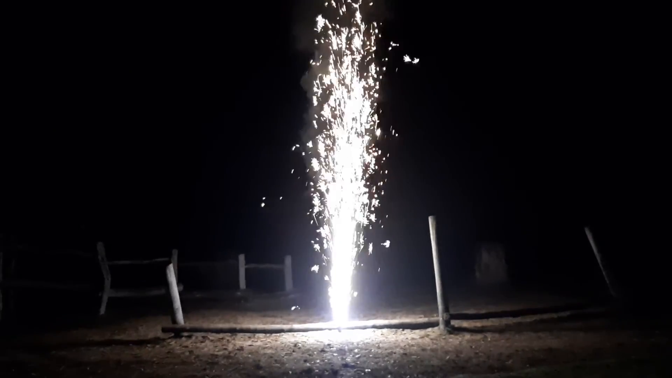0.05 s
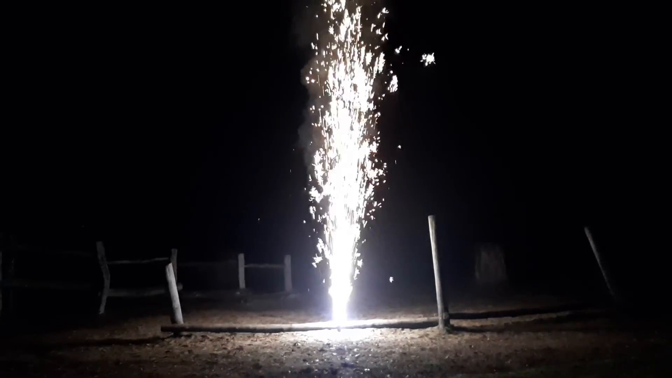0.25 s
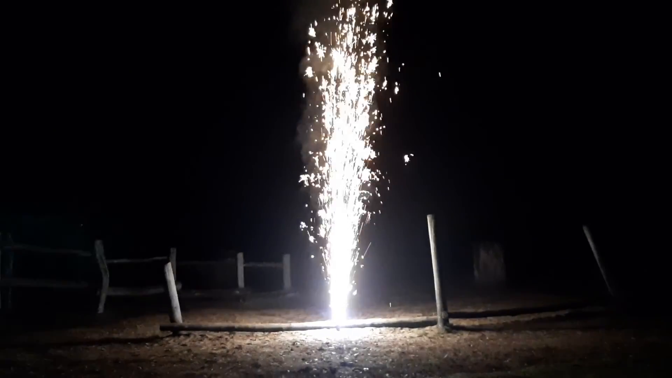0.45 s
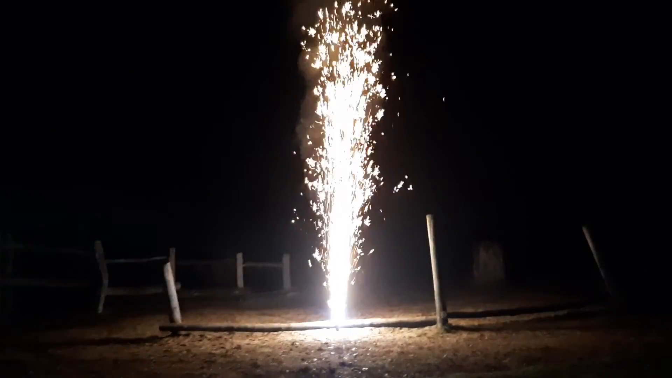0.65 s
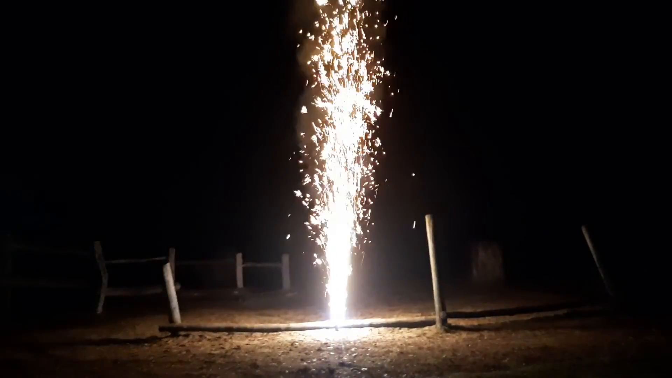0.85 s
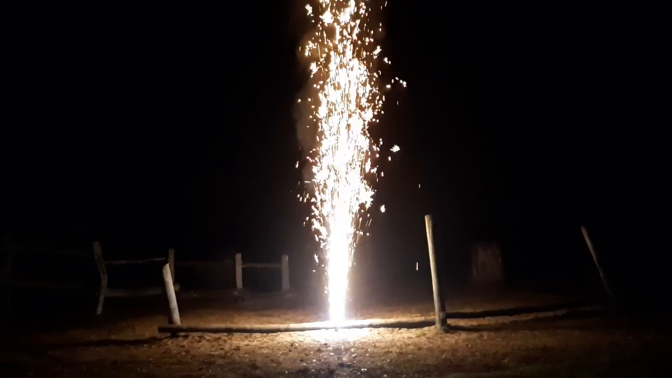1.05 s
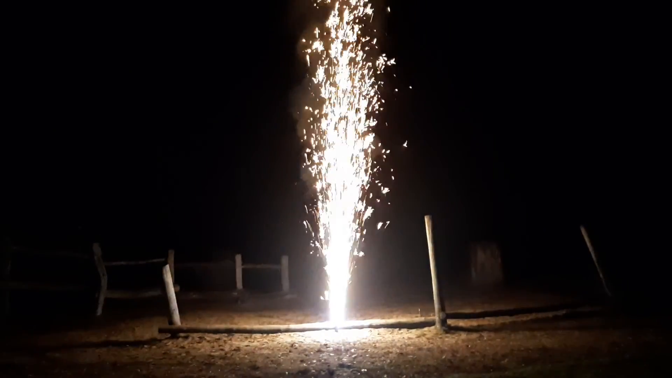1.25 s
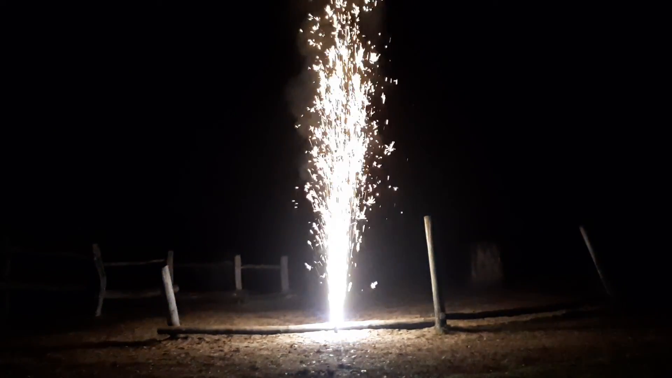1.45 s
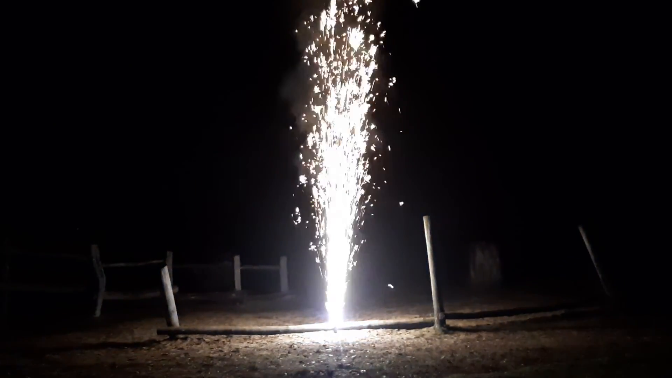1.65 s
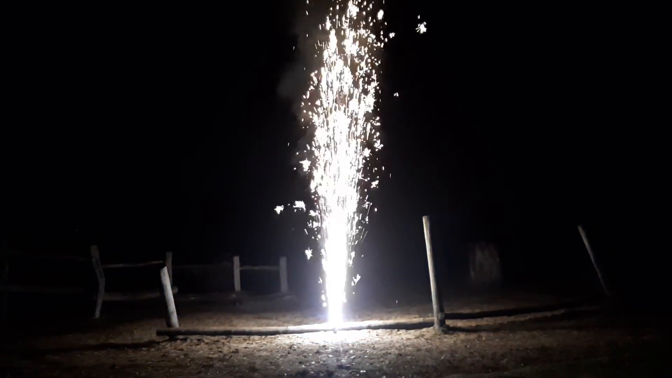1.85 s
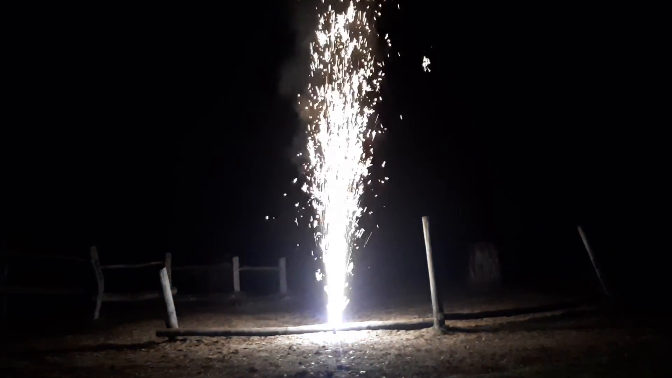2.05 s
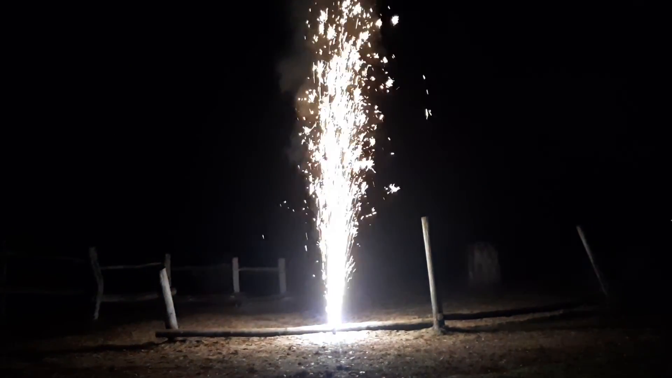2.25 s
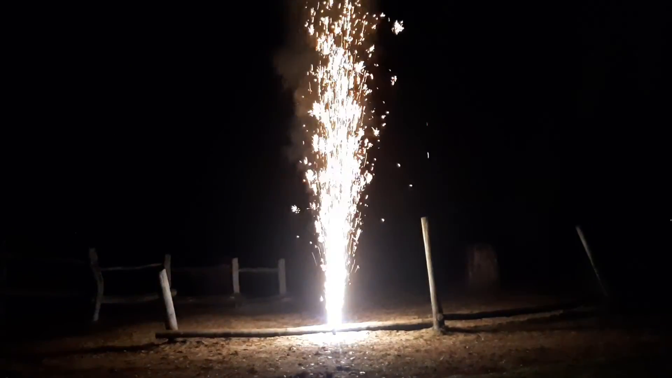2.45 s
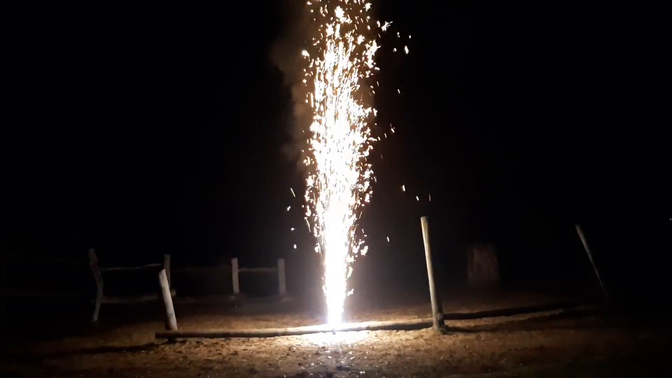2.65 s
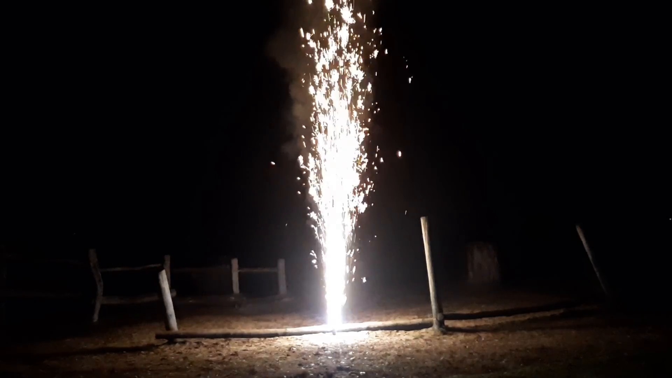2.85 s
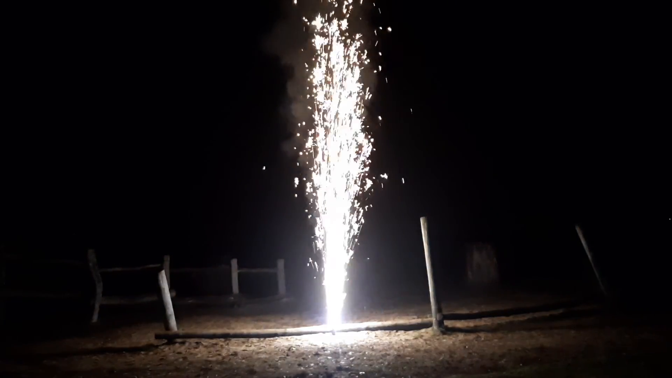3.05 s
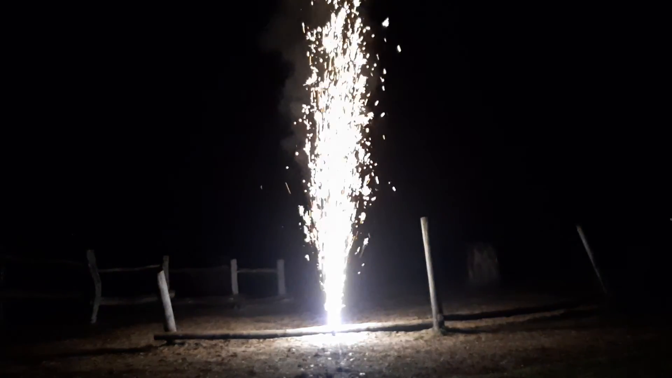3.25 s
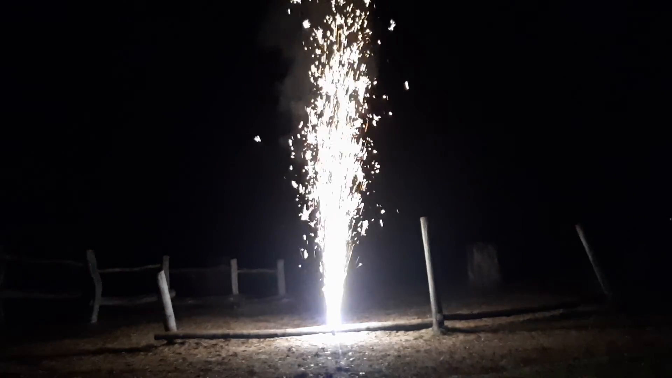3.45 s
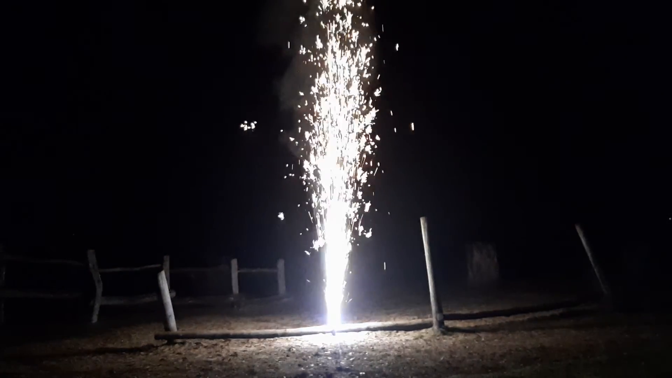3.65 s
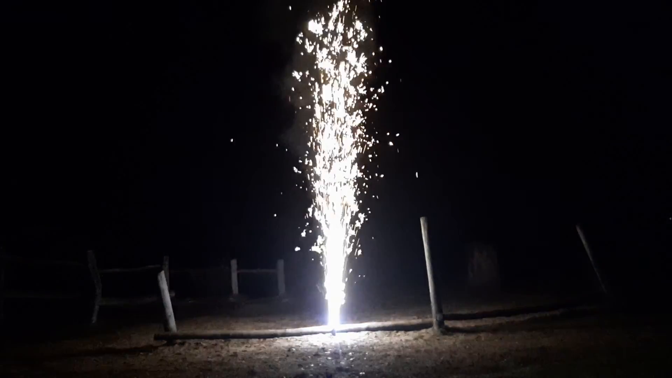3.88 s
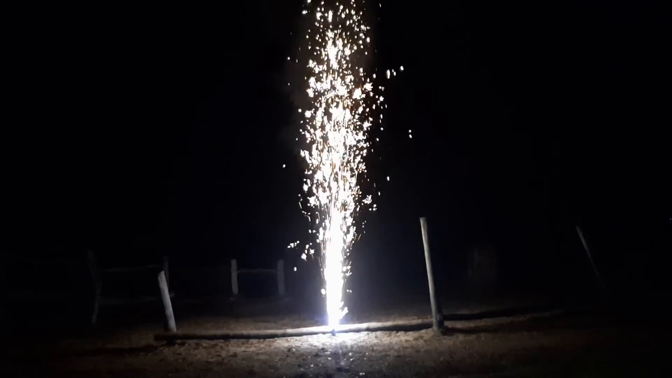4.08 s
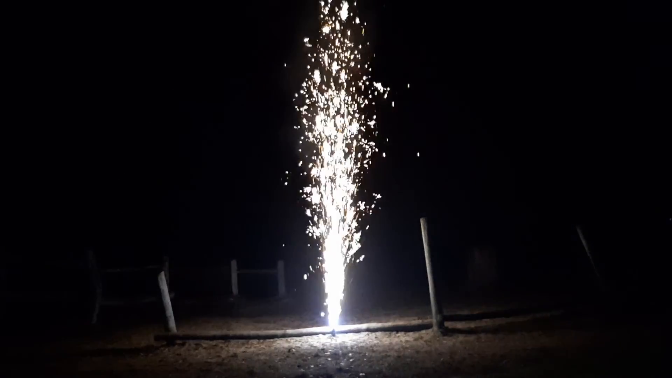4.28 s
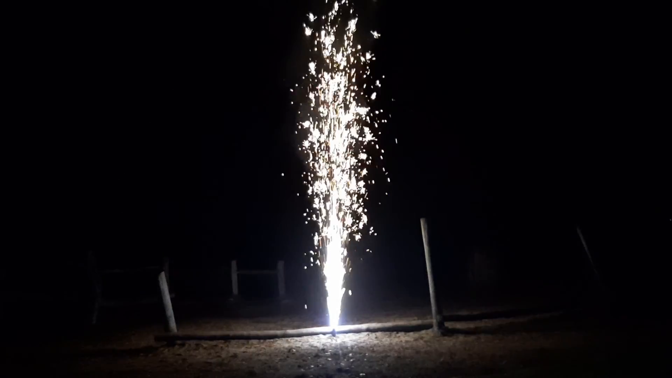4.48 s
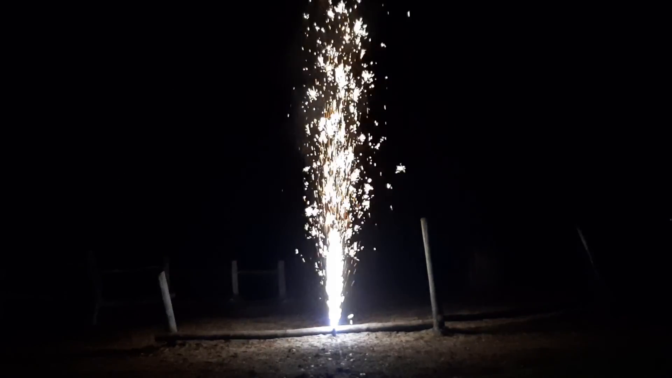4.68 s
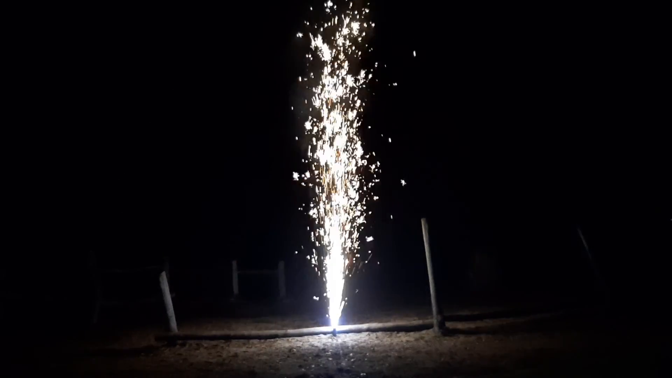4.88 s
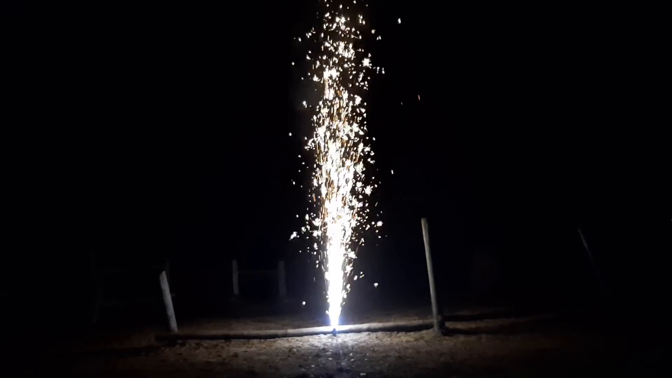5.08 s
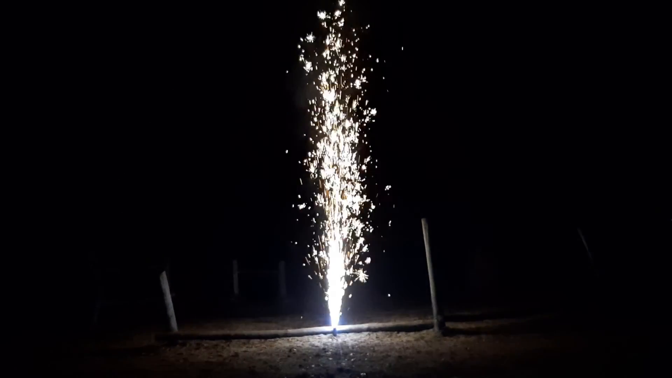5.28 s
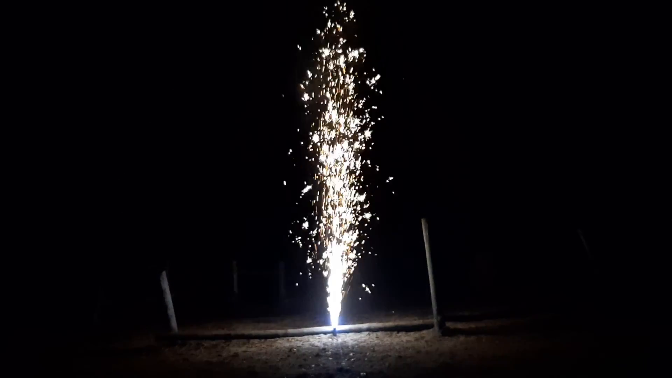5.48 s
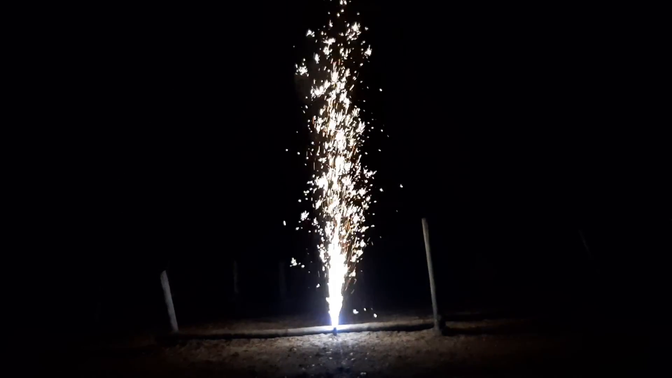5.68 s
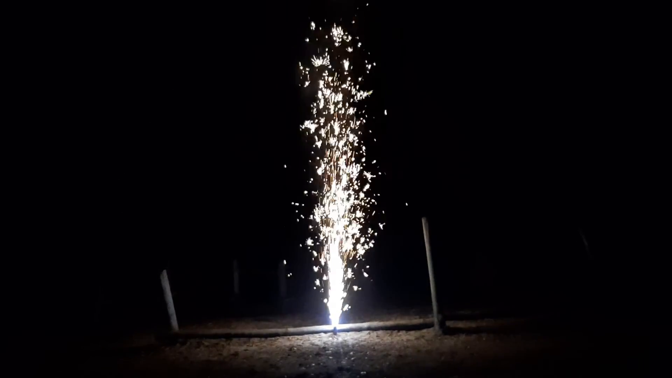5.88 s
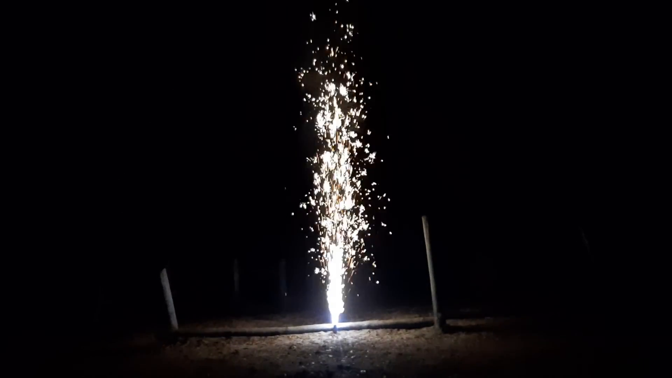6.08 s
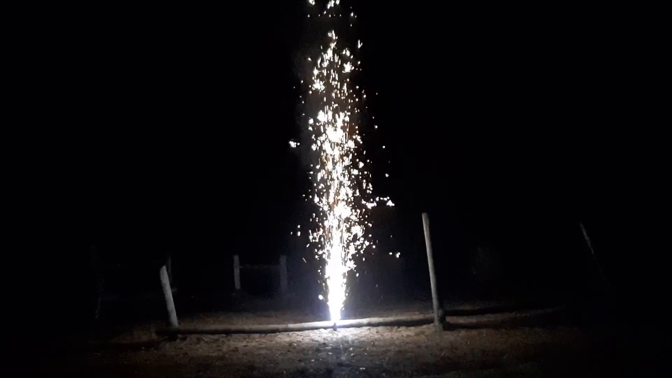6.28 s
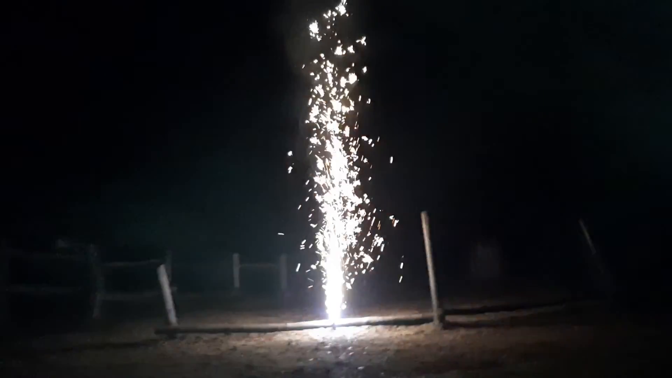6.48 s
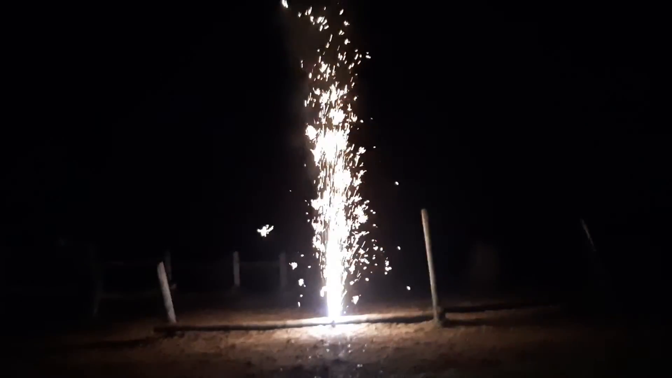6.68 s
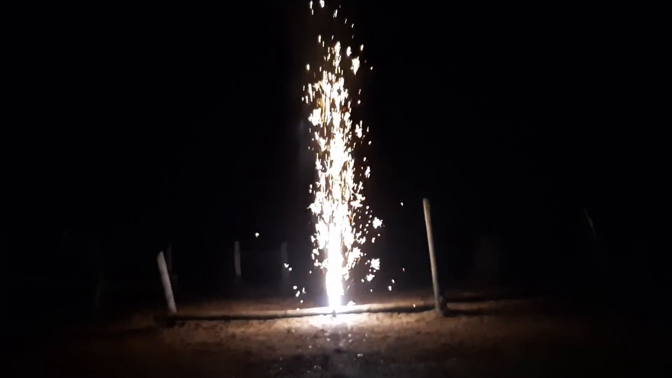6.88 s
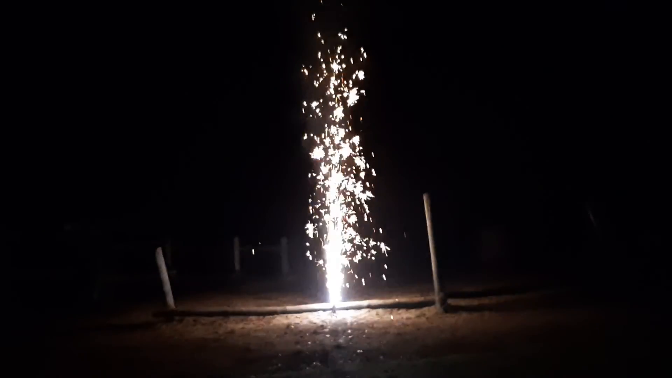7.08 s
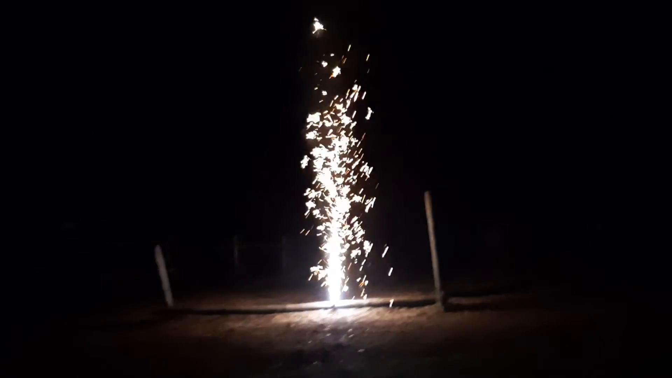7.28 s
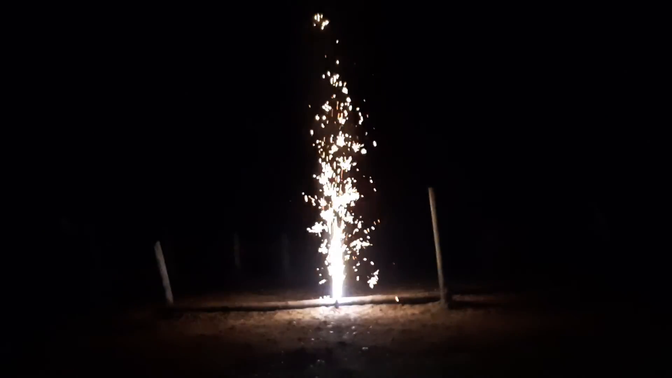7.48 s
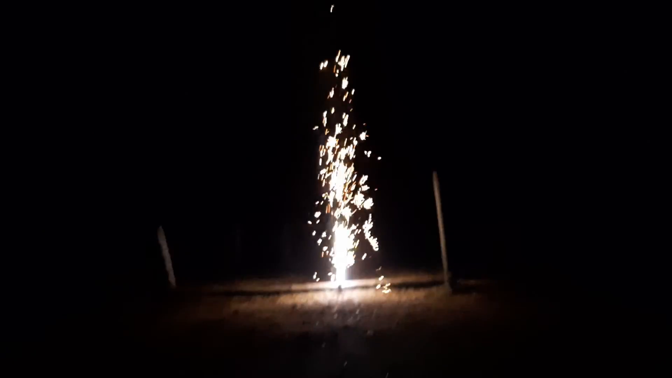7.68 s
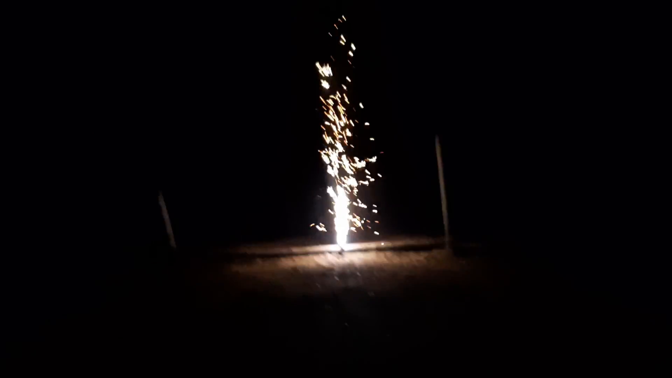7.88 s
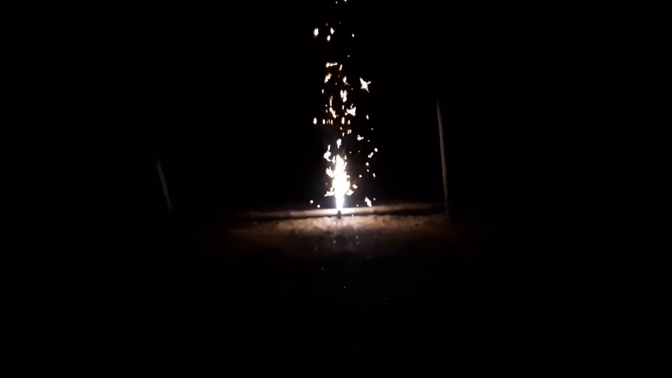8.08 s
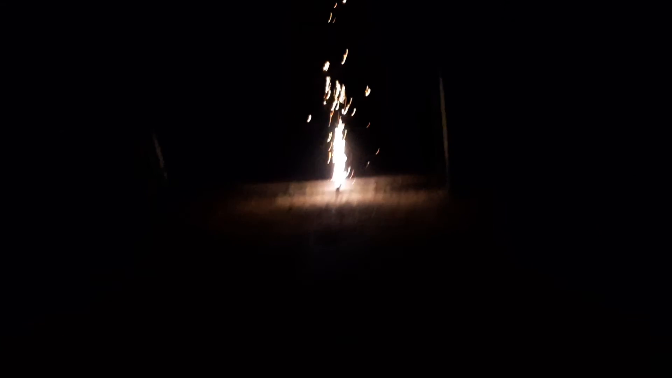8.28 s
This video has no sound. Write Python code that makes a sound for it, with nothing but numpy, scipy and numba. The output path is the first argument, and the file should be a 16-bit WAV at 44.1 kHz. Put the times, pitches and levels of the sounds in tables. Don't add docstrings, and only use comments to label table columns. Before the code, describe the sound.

Steady close roar of spraying sparks, dense and sizzling, its colour shifting slightly, dying down to faint hiss and sparse clicks in quiet night air.

```python
import sys
import numpy as np
from scipy import signal
from scipy.fft import rfft, irfft, next_fast_len
from scipy.io import wavfile
from scipy.ndimage import uniform_filter1d, map_coordinates
from numba import njit

SR = 44100
rng = np.random.default_rng(int(sys.argv[2]) if len(sys.argv) > 2 else 0)


def volts_from_db(level):
    exponent = np.asarray(level, float) / 20
    return 10 ** exponent


def dump_mix(stems):
    frames = np.atleast_2d(stems).T
    limited = np.clip(frames, -1, 1)
    pcm = np.round(limited * 32767).astype(np.int16)
    wavfile.write(sys.argv[1], SR, pcm)


N = 367347
T, M = np.arange(N) / SR, next_fast_len(N)
HZ = np.arange(M // 2 + 1) * SR / M + 1e-9

BAND_EDGES_HZ = (600, 2200, 8600)
# frequency in Hz, level in dB.
MIC = [(25, -48), (50, -12), (100, -9.5), (150, -3), (7800, 5.5), (9300, 2), (10200, -4.5), (11000, 2),
       (12500, 1.5), (14000, 1), (15800, -1)]
CUPPED, HALF, OPEN, TILTED, SPREAD, LOOSE, AWAY = range(7)
# gain of the top fizz in dB, share leaking past the
# microphone's notch (0-1), high dip in Hz, ring of the half-shut palm (0-1).
SHEEN = [(2, 0.32, 10300, 0.32), (1.5, .01, 8889, 0.5), (0.6, .01, 9500, 0), (0.7, 0.33, 9500, 0),
         (0.5, .01, 9170, .25), (1.9, .01, 9600, 0), (1.5, .03, 9200, 0.5)]


def shape(points):
    hz, db = np.transpose(points)
    return volts_from_db(np.interp(np.log(HZ), np.log(hz), db))


def unit(x):
    return x / np.sqrt(np.mean(x ** 2))


def echo(ms, gain, hz, width):
    delay = np.exp(-2j * np.pi * HZ * ms / 1000)
    return gain * delay / (1 + 1j * (HZ / hz - hz / HZ) * hz / abs(width))


def late(x, ms):
    return map_coordinates(x, [np.arange(N) - ms * SR / 1000], order=3, mode="mirror")


def through(x, response):
    kernel = np.roll(irfft(response, M), 2048)[:4096] * np.hanning(4096)
    return signal.oaconvolve(x, kernel)[2048:2048 + N]


def walk(rate):
    k = int(SR / rate)
    held = np.repeat(rng.standard_normal(N // k + 1), k)
    return uniform_filter1d(uniform_filter1d(held, k), k)[:N]


@njit
def band(x, hz, width):
    y, b, l = np.empty(len(x)), 0., 0.
    for i in range(len(x)):
        g, k = np.tan(np.pi * hz[i] / SR), width / hz[i]
        v = (b + g * (x[i] - l)) / (1 + g * (g + k))
        b, l, y[i] = 2 * v - b, l + 2 * g * v, k * v
    return y


def grip(table):
    # start in seconds, slide in seconds, new grip, size of the grip against its
    moves = [(0, 0, CUPPED, 1.01, .95), (.72, .14, HALF, 1.02, .9), (.9, .2, OPEN, 1, 1),
             (1.85, .25, TILTED, 1, 1), (2.22, .12, SPREAD, 1, 1), (2.64, .17, LOOSE, 1, 1),
             (3.28, .18, HALF, 1, 1.05), (3.48, .3, CUPPED, .99, 1.1), (3.8, .3, CUPPED, .97, 1.05),
             (5.25, .35, CUPPED, .95, .75), (6.35, .2, CUPPED, 1.03, .65), (6.55, .12, HALF, 1.02, .6),
             (6.67, .25, AWAY, 1, 1)]
    rows = np.array([[*table[kind], size, firm] for _, _, kind, size, firm in moves])
    s = np.ravel([(start, start + slide) for start, slide, *_ in moves])[1:]
    return [np.interp(T, s, np.repeat(col, 2)[:-1]) for col in rows.T]


def night():
    # frequency in Hz, level in dB per Hz.
    night_tone = [(15, -49), (25, -18), (144, 0.5), (403, 0), (672, -7.5), (1510, -12), (5670, -33),
                  (7420, -26), (8270, -64), (10500, -33), (15800, -24)]
    mid, side = rfft(rng.standard_normal((2, M))) * shape(night_tone)
    side = side * np.clip(0.17 + HZ / 3000, 0, 1)
    left, right = volts_from_db(-4.5) * (mid + side), mid - side
    return volts_from_db(-50) * unit(irfft(np.array([left, right]), M)[:, :N])


def bump():
    start_s, level_db, pitch_hz, rise_s, decay_s = 8.235, -43, 150, 0.0046, 0.059
    t = np.maximum(T - start_s, 0)
    low = unit(irfft(rfft(rng.standard_normal(M)) * echo(0, 1, pitch_hz, 120.0), M)[:N])
    return volts_from_db(level_db) * low * (1 - np.exp(-t / rise_s)) * np.exp(-t / decay_s)


def sparks():
    # start in seconds, peak level in dB, left minus right in dB.
    snaps = [
        (6.9586, -35, 0.0),
        (7.0794, -34, -0.5),
        (7.2998, -36, -1.0),
        (7.3844, -46.5, 4),
        (7.5193, -46, 0.0),
        (7.8516, -46, -0.5),
        (8.0334, -51, -2.0),
        (8.1778, -54, -1.0),
        (8.2494, -53, 4),
    ]
    length, decay_s = 2000, .004
    out, t = np.zeros((2, N + length)), np.arange(length) / SR
    for (s, db, pan_db), noise in zip(snaps, rng.standard_normal((len(snaps), length))):
        i = int(s * SR)
        sides_db = np.array([[pan_db], [-pan_db]]) / 2
        out[:, i:i + length] += volts_from_db(db - 8.0 + sides_db) * noise * np.exp(-t / decay_s)
    bright = shape([(1000, -15), (4000, -11), (9000, 1)])
    return irfft(rfft(out[:, :N], M) * shape(MIC) * bright, M)[:, :N]


def case_and_ground(gas):
    # delay in ms, signed gain, centre in Hz, width in Hz.
    case_left = [(0.227, 0.5, 3940.0, 620.0), (0.593, 0.5, 3700.0, 450.0), (0.909, 0.19, 1110.0, 830.0),
                 (1.5, 0.23, 1520.0, 300.0)]
    case_right = [(0.14, 0.47, 2690.0, 2840.0), (0.315, -0.42, 300.0, 1660.0), (0.633, 0.44, 600.0, 1970.0),
                  (1.278, -0.27, 6070.0, 300.0)]
    ground_left = [(2.01, 0.12, 3520.0, 3570.0), (2.21, -0.09, 4540.0, 1930.0),
                   (2.436, 0.1, 1190.0, 2240.0), (2.907, 0.04, 5670.0, 310.0),
                   (5.246, 0.05, 1780.0, 5360.0)]
    ground_right = [(2.033, 0.16, 1290.0, 2000.0), (2.262, -0.14, 6120.0, 18000.0),
                    (2.506, 0.23, 1180.0, 2220.0), (2.731, -0.16, 2650.0, 1740.0),
                    (2.866, -0.23, 2070.0, 690.0), (5.172, 0.11, 1430.0, 1080.0)]
    left_lead_ms = (.019, .085)
    # start in seconds, length in seconds, added ground delay in ms.
    lifts = [
        (-1, 1, .023),
        (0, 1.5, -.037),
        (5.6, 1.1, .06),
        (6.7, .35, .165),
        (7.05, .85, .025),
        (7.9, .25, .09),
    ]
    lift = sum(ms * np.clip((T - s) / length, 0, 1) for s, length, ms in lifts)
    top = HZ > BAND_EDGES_HZ[2]
    low_ms, top_ms = left_lead_ms
    lead = np.exp(2j * np.pi * HZ * np.where(top, top_ms, low_ms) / 1000)
    direct_left = volts_from_db(np.where(top, -.5, -2.03)) * lead
    case = [direct_left + sum(echo(*e) for e in case_left), 1 + sum(echo(*e) for e in case_right)]
    ground = [sum(echo(*e) for e in table) for table in (ground_left, ground_right)]
    return np.array([through(gas, a) + late(through(gas, b), lift) for a, b in zip(case, ground)])


def hand_echoes(gas):
    # palm delay in ms, gain, finger delay in ms, gain.
    palm_table = [(.385, .45, .323, .51), (.45, .42, .39, .3), (.49, .16, .375, -.12), (.49, .24, .34, -.3),
                  (.437, .41, .381, .27), (.452, .18, .563, .1), (.445, .1, .347, .09)]
    # knuckle delay in ms, gain.
    knuckle_table = [(1.16, .08), (.92, .27), (.772, .35), (.94, .28), (.92, .26), (.76, .22), (1.0, .1)]
    palm_ms, palm, finger_ms, finger, size, firm = grip(palm_table)
    knuckle_ms, knuckle, *_ = grip(knuckle_table)
    out = np.zeros((2, N))
    for port, ms, gain, hz, width in ((0, palm_ms, palm, 2100, 4080), (0, finger_ms, finger, 6810, 9000),
                                      (1, knuckle_ms, knuckle, 4230, 3330)):
        out[port] -= firm * gain * late(through(gas, echo(0, 0.61, hz, width)), size * ms)
    return out


def hand_hollows(out):
    # palm hollow in Hz, depth (0-1), finger gap in Hz, depth (0-1).
    hollow_table = [(2660, .85, 6350, .35), (2300, .5, 3900, .55), (2250, .15, 3750, .55),
                    (2250, .4, 3800, .55), (2300, .5, 4900, .7), (2300, .4, 4080, .5),
                    (2200, .02, 4000, .02)]
    # lower crease in Hz, depth (0-1), upper crease in Hz, depth (0-1).
    crease_table = [(3550, .35, 4900, .15), (3300, .5, 4300, .15), (3750, .45, 5150, .55),
                    (3280, .5, 4150, .25), (3280, .5, 4300, .15), (3950, .35, 5050, .45),
                    (3400, .05, 4900, .05)]
    # ring in Hz, gain.
    rim_table = [(15200, 0.54), (15000, .02), (15000, .1), (15000, .02), (15000, .02), (15000, .15),
                 (14500, .4)]
    hollow_hz, hollow, gap_hz, gap, size, firm = grip(hollow_table)
    low_hz, low, high_hz, high, *_ = grip(crease_table)
    _, _, dip_hz, ring, *_ = grip(SHEEN)
    dips = ((0, hollow_hz, hollow, 220.), (0, gap_hz, gap, gap_hz[0] / 14),
            (1, low_hz, low, 280.), (1, high_hz, high, 344.),
            (0, dip_hz, .65, 500.), (1, dip_hz, .65, 500.))
    for port, hz, depth, width in dips:
        out[port] -= np.clip(firm * depth, 0, .95) * band(out[port], hz / size, width)
    out[0] += ring * band(out[0], 2950 / size, 400.)
    rim_hz, rim, *_ = grip(rim_table)
    return out + rim * np.array([band(x, rim_hz, 2200.) for x in out])


def jet(sources, flicker):
    # frequency in Hz, level in dB per Hz.
    jet_tone = [(150.0, -11.5), (300.0, -16), (500.0, -16), (800.0, -11.5), (1300.0, -12), (2000.0, -7),
                (3000.0, 1.5), (4200.0, -3.5), (5500.0, -5), (6800.0, -12.5), (7800.0, -25.5)]
    # gain, centre in Hz, width in Hz.
    tube = [(0.76, 230.0, 120.0), (1.79, 410.0, 130.0), (0.5, 610.0, 70.0), (0.55, 980.0, 100.0),
            (1.32, 1520.0, 140.0), (0.44, 2060.0, 130.0)]
    # time in seconds, level in dB.
    pressure = [(0, -25.5), (1.5, -25.5), (2.5, -26), (3.2, -25.5), (3.75, -25.5), (4.1, -27.5), (5.0, -29),
                (6.0, -32), (6.6, -34.5), (7.1, -38.5), (7.5, -45), (7.85, -51), (8.1, -57), (8.33, -63)]
    # full level in dB, dB lost per dB at first,
    # knee in dB, dB lost per dB past the knee.
    ranges = [
        (-40.5, 0.01, 17, 0.42),
        (-32, 0.54, 19.5, .9),
        (-26, 1.05, 13, 1.06),
        (-40, 1.58, 6, 1.01),
    ]
    full_db = -26.5
    loss_db = full_db - np.interp(T, *np.transpose(pressure))
    dbs = [start_db - early * loss_db - (final - early) * np.logaddexp(0, loss_db - knee_db)
           for start_db, early, knee_db, final in ranges]
    dbs[3] = dbs[3] + grip(SHEEN)[0]
    flicker_db = (0.12, 0.051, 0.34, 1.0)
    above = [1.] + [1 / (1 + (hz / HZ) ** 8) for hz in BAND_EDGES_HZ] + [0.]
    ringing = np.prod([1 + echo(0, *mode) for mode in tube], axis=0)
    gas = rfft(sources, M) * (shape(jet_tone) * shape(MIC) * ringing)
    out = 0
    for k in range(4):
        hiss = unit(irfft(gas * (above[k] - above[k + 1]), M)[:, :N])
        out = out + hiss * volts_from_db(dbs[k] + flicker_db[k] * flicker)
    return out


def fountain():
    # frequency in Hz, level in dB.
    plume_tone = [(30, -6), (80, -14), (300, -24), (1000, -21), (3000, -16), (7000, -12), (10000, -8),
                  (15000, -8)]
    flicker = .5 * walk(20) + walk(45) + 0.66 * walk(200)
    noise = rng.standard_normal((3, N))
    crackle = (rng.random(N) < 1500 / SR) * rng.standard_normal(N)
    noise[0] += 1.48 * crackle
    core, *plume = jet(noise, flicker)
    held = hand_hollows(case_and_ground(core) + hand_echoes(core))
    return held + np.array([through(x, shape(plume_tone)) for x in plume])


def scene():
    return night() + bump() + sparks() + fountain()


def low_pass(x):
    return signal.sosfilt(signal.butter(12, 16970, fs=SR, output="sos"), x)


def record(dry):
    # frequency in Hz, level in dB.
    notch = [(7850, 0), (8150, -10), (8300, -24), (8900, -24), (9150, -5), (9400, 0)]
    leak = np.clip(grip(SHEEN)[1], 0, 1)
    cut = HZ < 15800
    heard = [(1 - leak) * through(x, shape(notch) * cut) + leak * through(x, 1. * cut) for x in dry]
    return low_pass(np.array(heard))


dry = scene()
out = record(dry)
dump_mix(out)
```